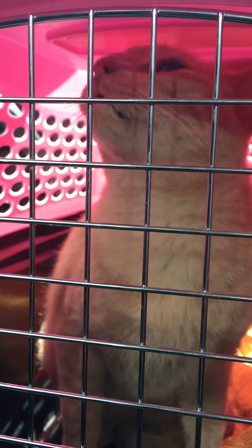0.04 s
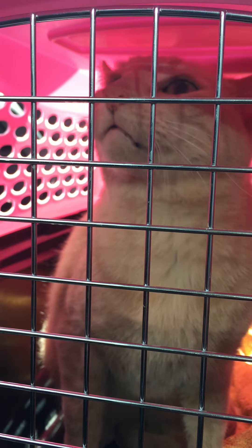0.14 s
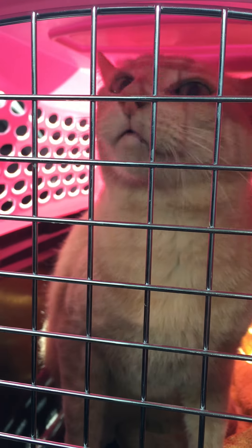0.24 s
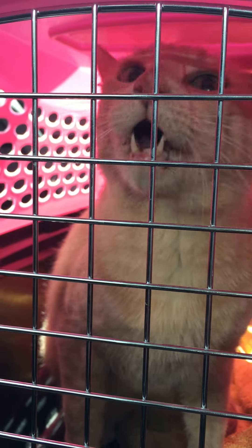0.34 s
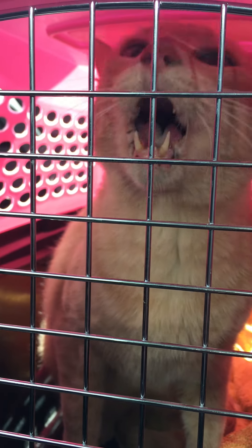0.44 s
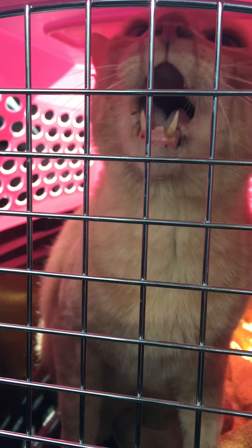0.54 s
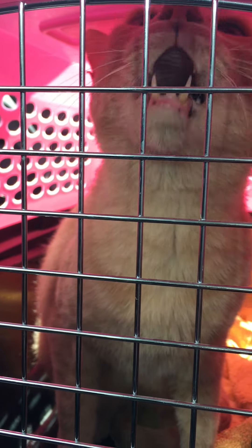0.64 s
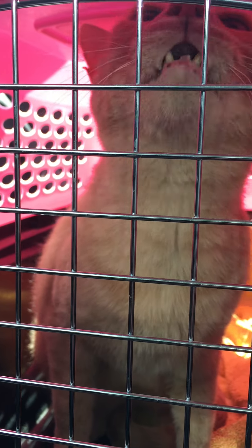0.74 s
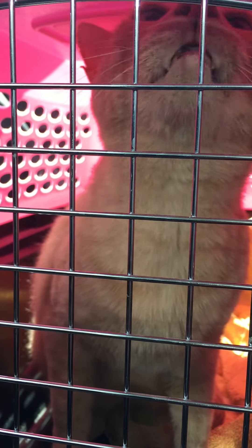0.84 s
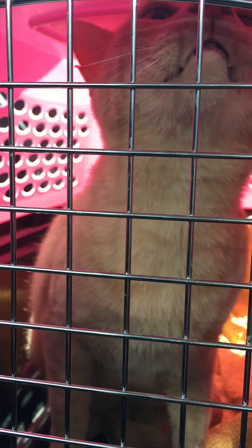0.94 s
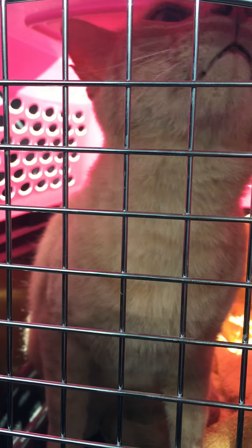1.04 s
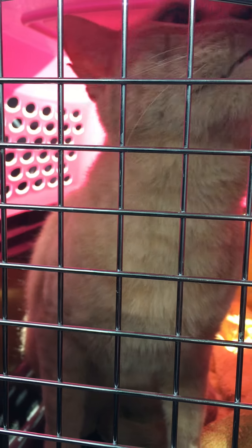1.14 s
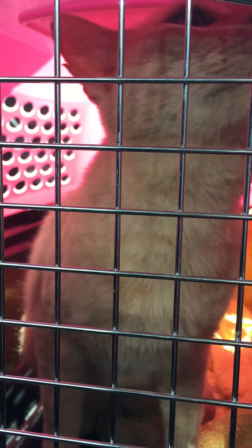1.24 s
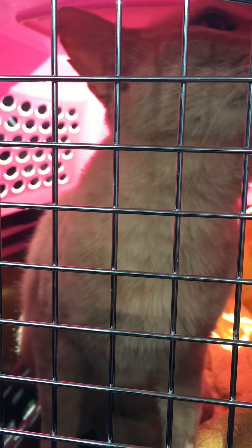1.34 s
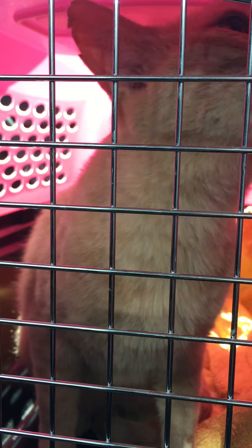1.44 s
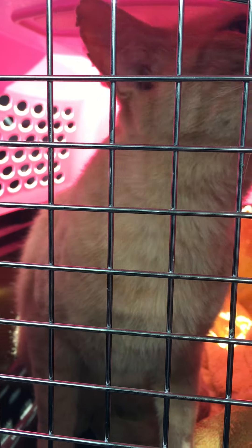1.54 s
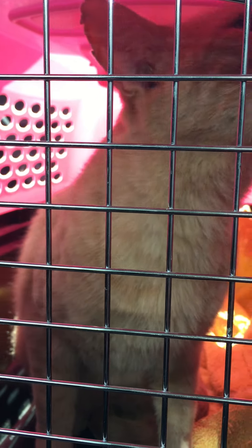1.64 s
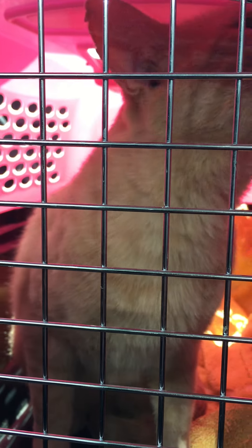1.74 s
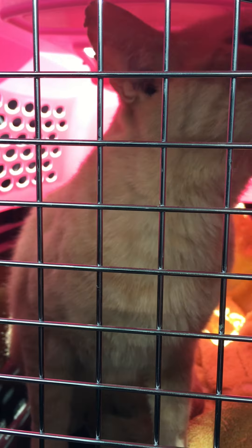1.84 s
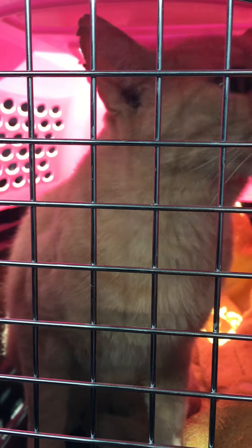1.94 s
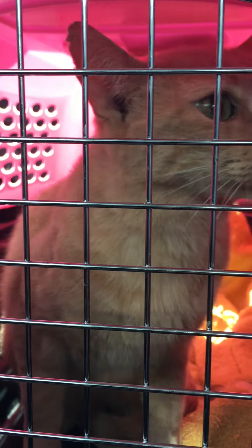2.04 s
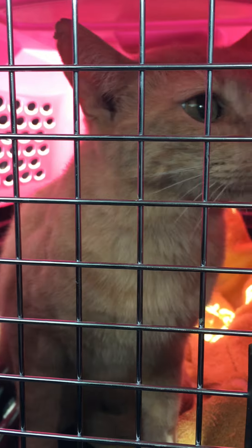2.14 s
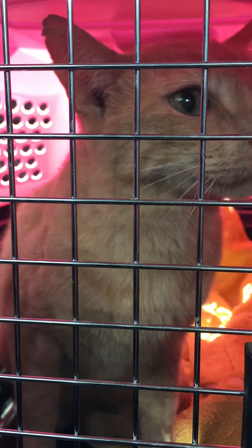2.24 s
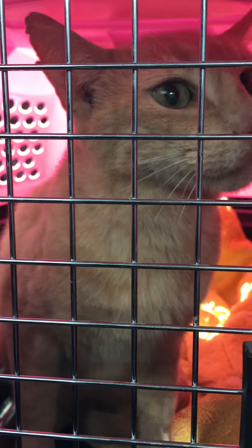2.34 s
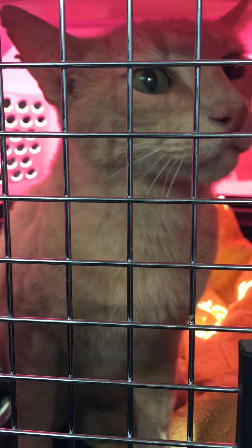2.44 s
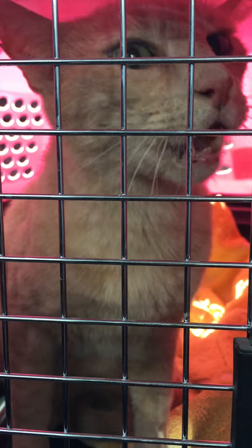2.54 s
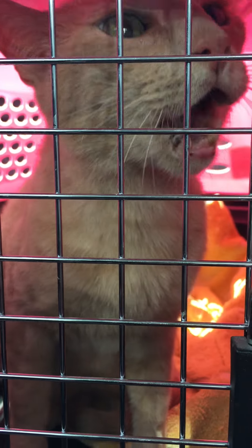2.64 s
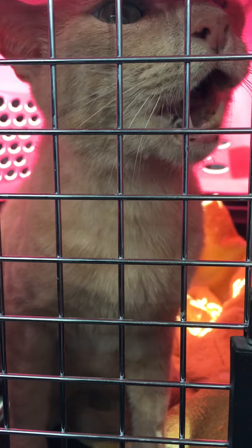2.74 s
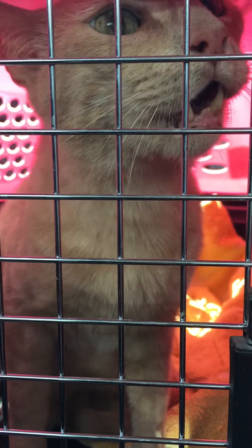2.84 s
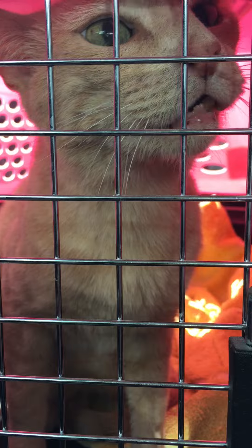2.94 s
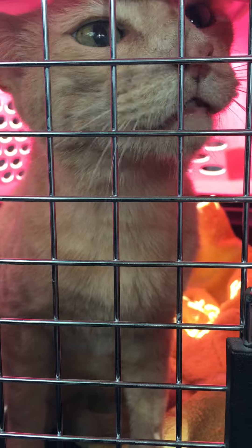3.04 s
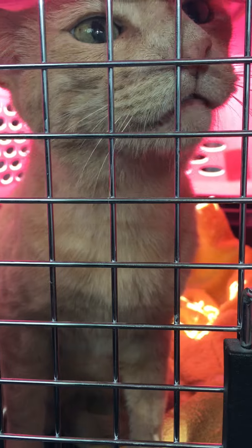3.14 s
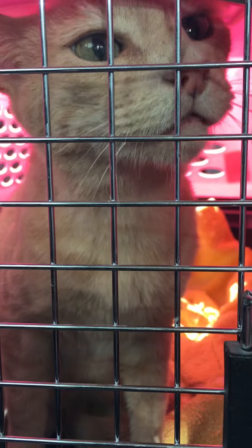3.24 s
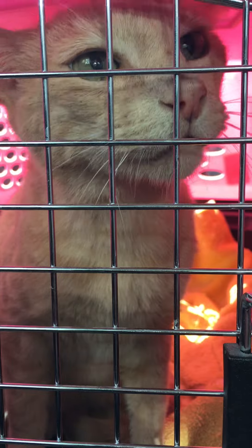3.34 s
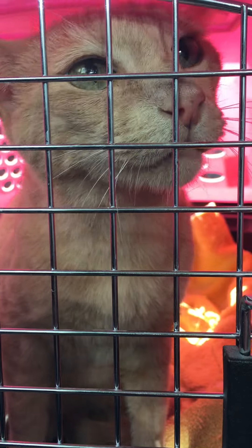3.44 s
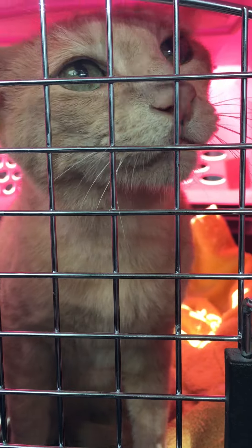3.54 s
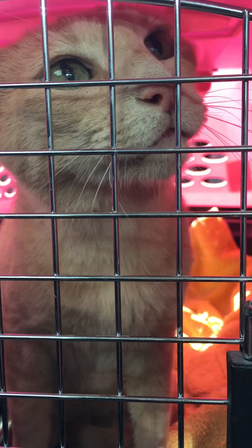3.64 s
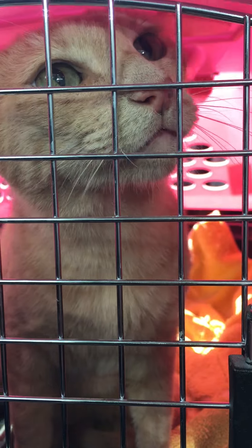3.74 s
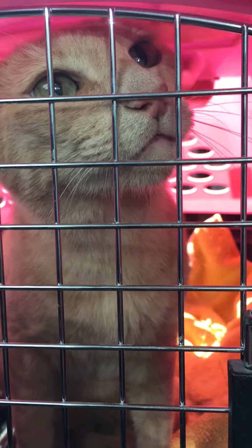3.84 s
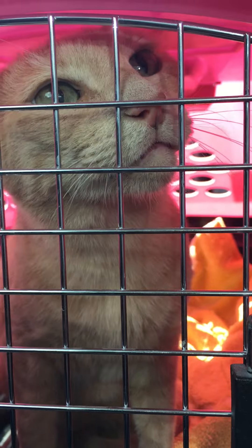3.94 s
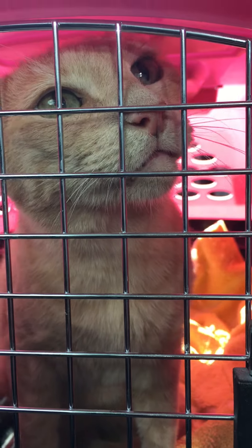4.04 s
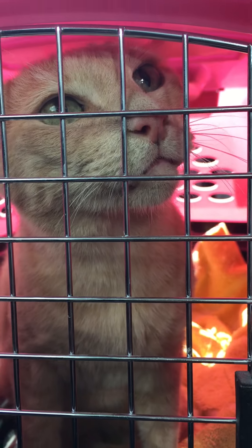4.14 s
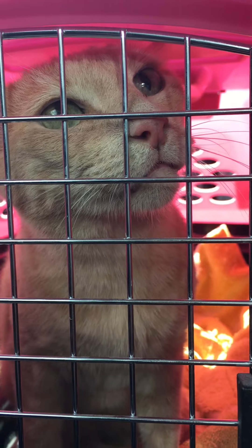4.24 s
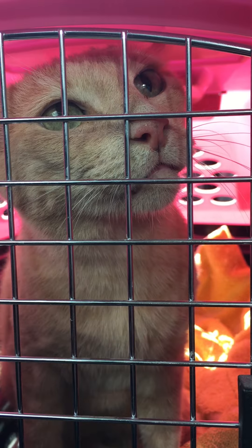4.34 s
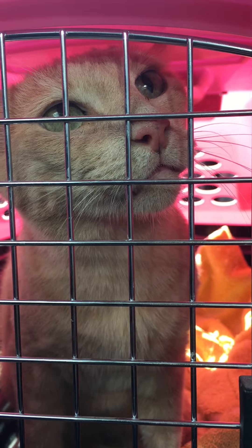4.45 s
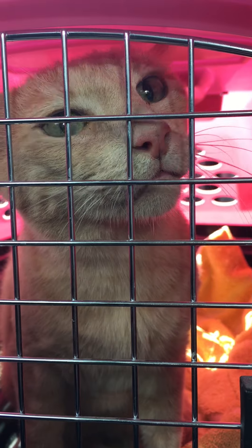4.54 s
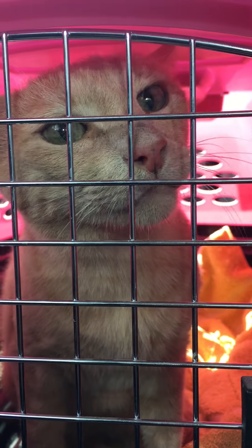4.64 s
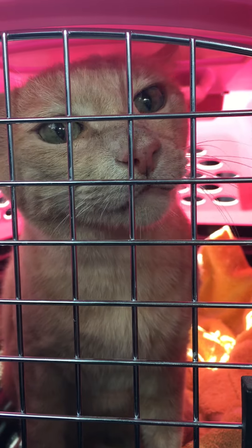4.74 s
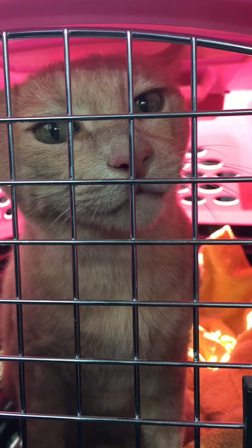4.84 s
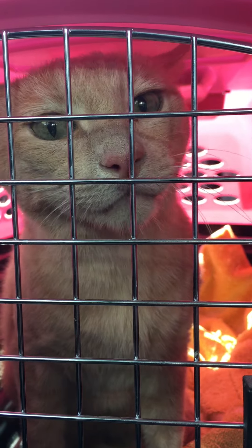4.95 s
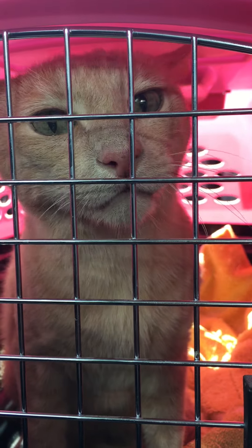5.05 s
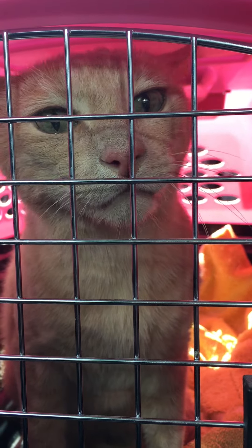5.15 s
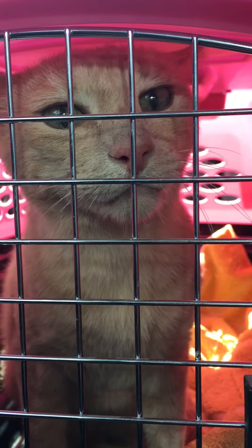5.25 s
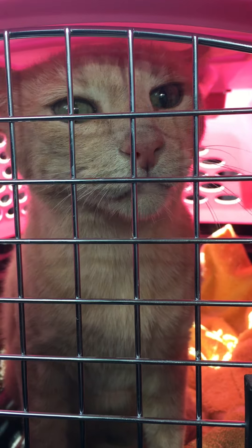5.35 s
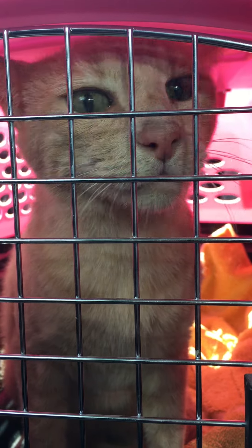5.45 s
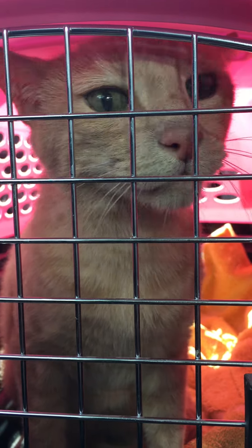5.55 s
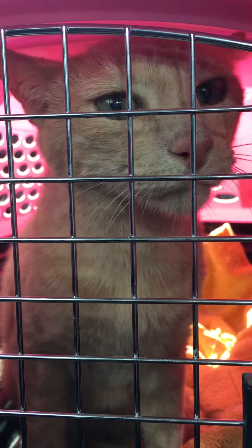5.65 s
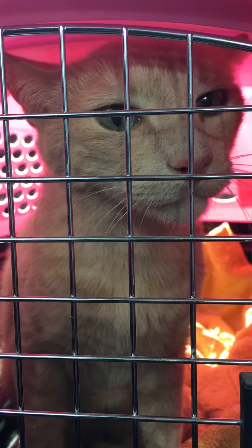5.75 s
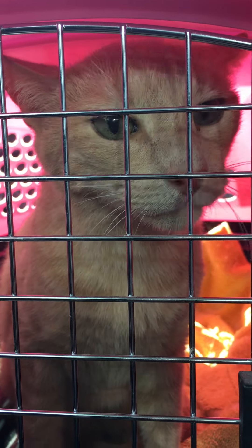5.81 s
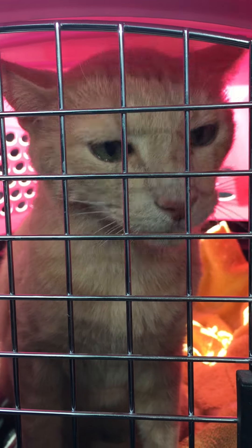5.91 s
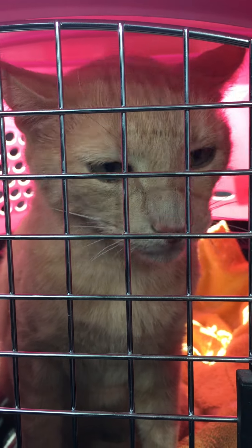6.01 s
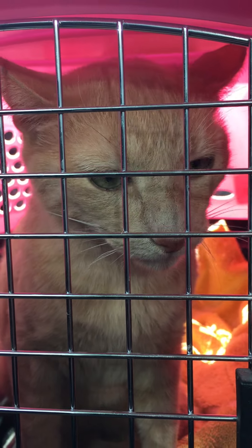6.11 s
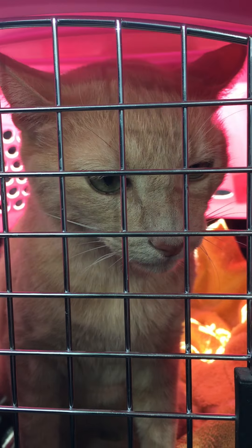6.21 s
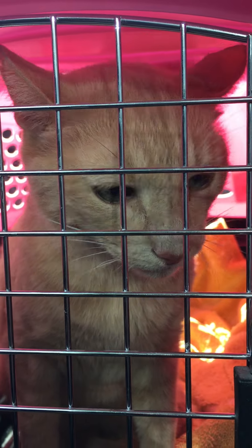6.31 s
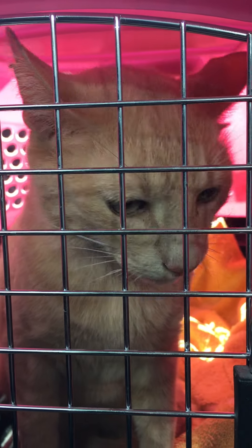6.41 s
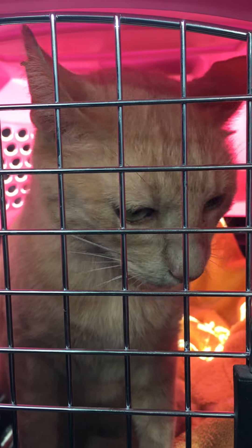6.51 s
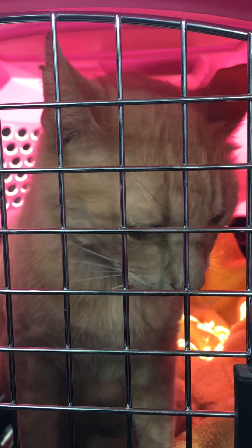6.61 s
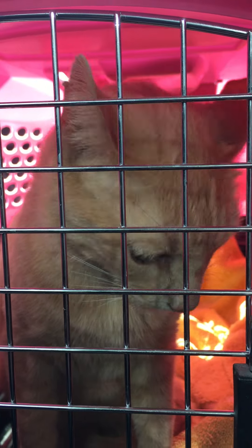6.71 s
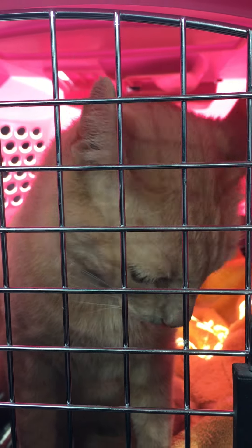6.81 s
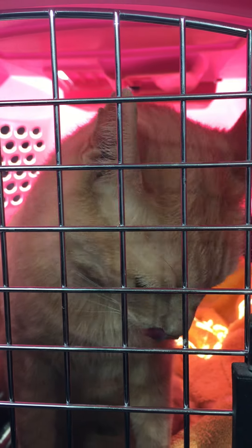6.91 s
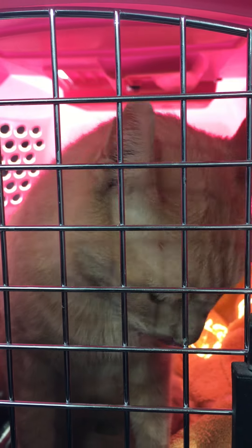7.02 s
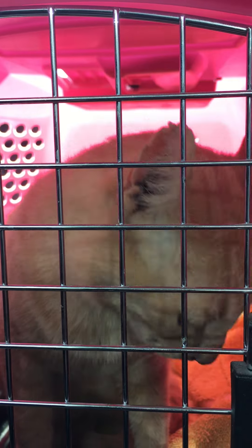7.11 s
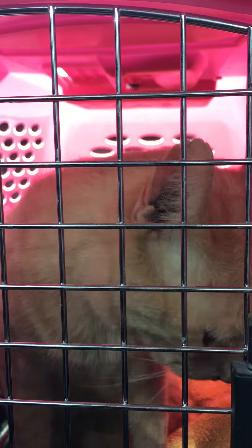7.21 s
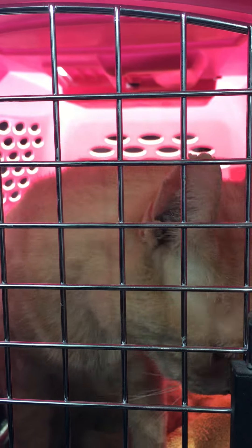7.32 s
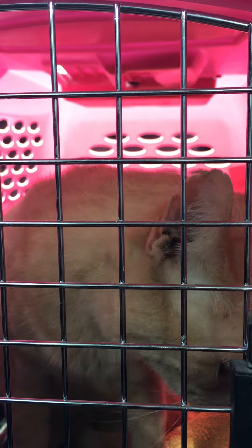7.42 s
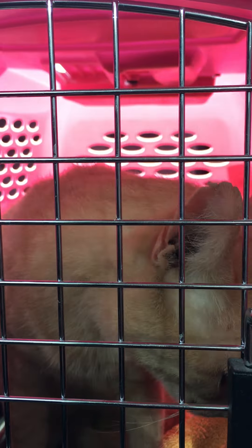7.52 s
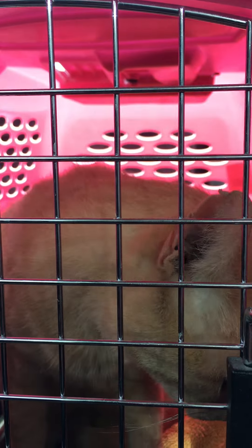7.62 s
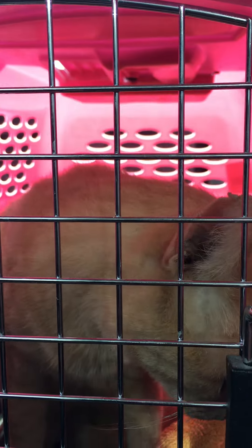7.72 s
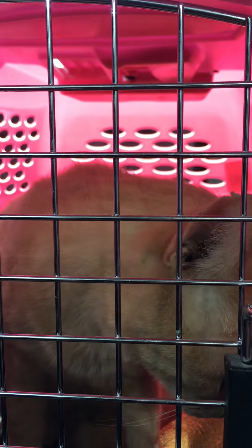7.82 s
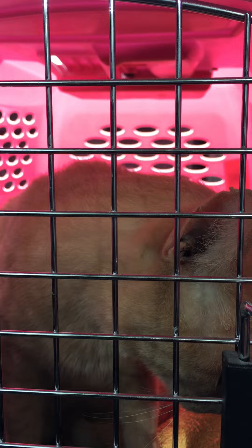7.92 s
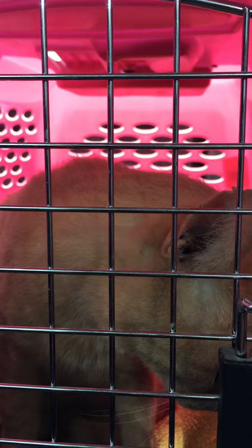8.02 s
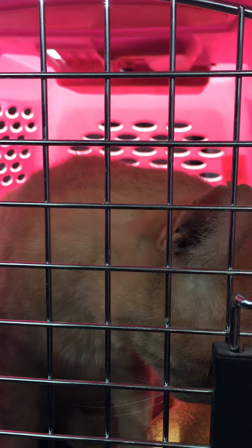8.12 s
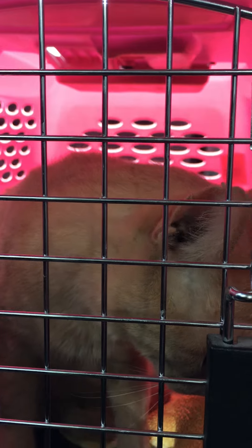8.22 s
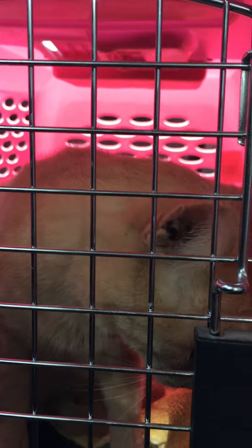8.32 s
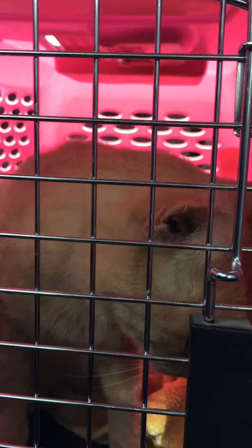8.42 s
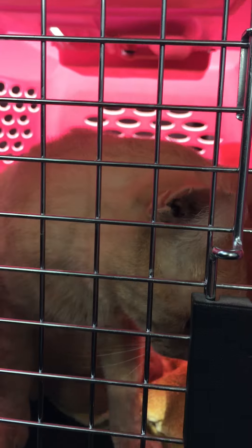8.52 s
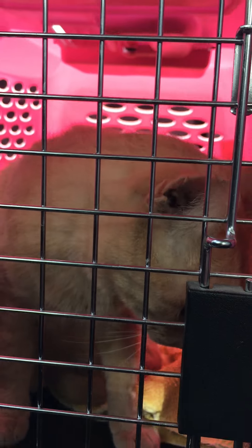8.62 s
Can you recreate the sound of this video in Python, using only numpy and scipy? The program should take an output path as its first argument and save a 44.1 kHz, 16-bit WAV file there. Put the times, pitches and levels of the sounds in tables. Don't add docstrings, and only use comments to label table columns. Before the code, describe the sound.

Inside a moving vehicle, a caged cat yowls loudly twice, then more weakly after a long gap, while the engine hums evenly beneath.

```python
import sys
import numpy as np
from scipy import signal
from scipy.fft import rfft, irfft, next_fast_len
from scipy.io import wavfile
from scipy.ndimage import uniform_filter1d, map_coordinates

SR = 44100
rng = np.random.default_rng(int(sys.argv[2]) if len(sys.argv) > 2 else 0)


def voltage_ratio(decibels):
    exponent = np.asarray(decibels, float) / 20
    return 10 ** exponent


def to_wav(s):
    ch = np.atleast_2d(s).T
    pcm = np.round(np.clip(ch, -1, 1) * 32767)
    wavfile.write(sys.argv[1], SR, pcm.astype(np.int16))


N = 382337


def unit(x):
    return x / np.sqrt(np.mean(x ** 2) + 1e-20)


def along(points, hz):
    point_hz, point_db = np.transpose(points)
    return np.interp(np.log(hz + 1), np.log(point_hz + 1), point_db, left=-120, right=-120)


def wobble(rate_hz, size=N):
    knots = rng.standard_normal(int(size * rate_hz / SR) + 4)
    return map_coordinates(knots, [np.arange(size) * rate_hz / SR])


def noise(gain):
    m = next_fast_len(N)
    spectrum = rfft(rng.standard_normal(m)) * gain(np.fft.rfftfreq(m, 1 / SR))
    return unit(irfft(spectrum, m)[:N])


def resonance(hz, centre_hz, width_hz):
    return centre_hz ** 2 / (centre_hz ** 2 - hz ** 2 + 1j * hz * width_hz)


def bump(t, at_s, length_s):
    return np.exp(-((t - at_s) / length_s) ** 2)


def cat():
    # time_s, held_pitch_hz, effort_db, jaw (0-1), tongue (0-1)
    howl_1 = [
        (.4, 623, -38.5, 0.15, 0.4),
        (.485, 625, -24.5, 0.42, 0.56),
        (.54, 646, -20.5, 0.79, 1),
        (.59, 625, -22, 0.88, .78),
        (.66, 623.8, -19.5, 0.93, 0.61),
        (.8, 597.2, -22, 0.86, 0.68),
        (.885, 580, -24, 0.45, .36),
        (1.02, 569.5, -30.5, .24, 0.1),
        (1.1, 560, -37, 0.15, 0),
    ]
    howl_2 = [
        (2.61, 636, -40.5, 0.081, 0.36),
        (2.67, 611, -26.5, .32, .63),
        (2.72, 617, -21, 0.64, 0.87),
        (2.78, 617, -21.5, 0.83, 0.72),
        (2.855, 629, -17.5, 0.84, 0.65),
        (2.98, 611, -17.5, 0.73, 0.65),
        (3.045, 590.8, -21.5, .48, 0.54),
        (3.27, 551.3, -33, .44, 0.34),
        (3.36, 520, -35.5, .3, 0.07),
    ]
    howl_3 = [
        (7.17, 553, -33, .1, .33),
        (7.235, 555, -32, 0.2, 0.52),
        (7.3, 550, -27, 0.38, 0.32),
        (7.345, 558, -26.5, 0.34, 0.24),
        (7.41, 564.5, -24, 0.39, .29),
        (7.55, 584, -24.5, 0.47, 0.27),
        (7.65, 597.4, -26.5, .57, 0.42),
        (7.72, 599, -30.5, 0.62, 0.45),
        (7.94, 585, -51.5, 0.62, .44),
    ]
    # slack_pitch_hz, middle_s, spread_s, hoarseness_db
    tension = [
        (338.4, .525, .037, 0),
        (336.6, 2.737, 0.036, -1),
        (472, 7.283, .024, -17),
    ]
    # hz, level_db
    toward = [(2600, -5), (3500, -18.5), (4250, -9.5), (4850, -4), (5500, -1.5), (6200, -4), (7100, -11),
              (8000, -15), (9400, -32), (11200, -29), (13000, -37), (15500, -37.5)]
    aside = [(2600, -23), (3600, -9), (4300, -5), (4900, 1), (5500, -2.5), (6200, -0.5), (7000, -4),
             (8000, -1), (9400, -26), (11200, -21), (13000, -30), (15500, -26)]
    away = [(2600, 1.5), (3500, -3), (4100, -8), (4700, -4), (5200, -21), (6200, -19), (7300, -7),
            (8300, -9), (9400, -29), (11200, -18.5), (13000, -48.5), (15500, -18)]
    # time_s, length_s, level_db
    puffs = [
        (0.49, .04, -54),
        (2.73, 0.05, -52),
        (.665, .008, -59),
        (2.815, .008, -51),
    ]
    # hz, db_per_hz
    breath_colour = [(1500, -28), (2600, -14), (3700, -17), (5000, 1), (6100, 4), (7000, -13), (8200, -8.5),
                     (10000, -21), (15600, -22.5)]
    # delay_s, level_db
    walls = [(.0011, -35), (.0019, -47), (.0031, -38), (.0052, -15.5), (.0083, -28)]

    t = np.arange(N) / SR
    flow = sum(voltage_ratio(db) * bump(t, at_s, length_s) for at_s, length_s, db in puffs)
    breath = flow * voltage_ratio(4.6 * wobble(90)) * noise(lambda hz: voltage_ratio(along(breath_colour, hz)))
    voice = howl(howl_1, tension[0], toward, bright_db=-38, chest_db=-36.0)
    voice = voice + howl(howl_2, tension[1], aside, bright_db=-44, chest_db=-33.5)
    voice = voice + howl(howl_3, tension[2], away, bright_db=-40.5, chest_db=-47.5)
    direct = voice + breath
    return direct + sum(voltage_ratio(db) * np.roll(direct, round(delay_s * SR)) for delay_s, db in walls)


def howl(rows, tighten, upper, bright_db, chest_db):
    tilt_db_per_octave, first_width_hz, second_width_hz, nose_hz = -5, 155, 140, 2970
    jitter, shimmer_db, flutter_db, ripple_db, fizz = 0.0022, 2, 2, 2.5, 0.15
    onset_s, cut_s = 0.02, 0.0078

    start_s, end_s = rows[0][0], rows[-1][0]
    start, end = round(start_s * SR), round(end_s * SR)
    t = np.arange(start, end) / SR
    step = t[::32]
    pitch, effort_db, first_hz, second_hz, bright_db, cavities = controls(rows, tighten, step, bright_db)
    k = np.arange(1, 44)[:, None]
    hz = k * pitch

    def drifts(rate_hz):
        return np.array([wobble(rate_hz * 32, size=len(step)) for _ in k])

    folds = voltage_ratio(effort_db + tilt_db_per_octave * np.log2(k))
    throat = folds * resonance(hz, first_hz, first_width_hz) * resonance(hz, second_hz, second_width_hz)
    throat /= np.sqrt(1 + (hz / nose_hz) ** 8)
    glints = sum(g ** 2 * np.exp(-((hz - c) / w) ** 2) for c, w, g in cavities)
    drift = drifts(14)
    flutter = drifts(70)
    ripple = np.interp(hz, np.arange(20000), wobble(SR / 170, size=20000))
    broad = voltage_ratio(bright_db + along(upper, hz) + shimmer_db * drift + ripple_db * ripple)
    mouth = np.sqrt(broad ** 2 + glints) * voltage_ratio(flutter_db * flutter)
    mouth *= 1 + fizz * np.sqrt(hz / 6000) * (600 / pitch) * drifts(450)
    throat *= voltage_ratio(0.71 * (600 / pitch) ** 2 * flutter)
    size = np.hypot(np.abs(throat), mouth)
    size[0] = voltage_ratio(chest_db + 0.27 * effort_db) * np.abs(resonance(pitch, 733, 170))
    lag = np.unwrap(np.angle(throat), axis=1) - 0.31 * k ** 2

    rate_hz = np.interp(t, step, pitch)
    tremble = jitter * (600 / rate_hz) ** 3 * wobble(161.7, size=len(t))
    tremble = tremble + 0.0032 * wobble(14.26, size=len(t))
    turns = np.cumsum(rate_hz * (1 + tremble)) / SR
    voice = 0
    for n, level, phase in zip(k, size, lag):
        voice = voice + np.interp(t, step, level) * np.cos(2 * np.pi * n * turns + np.interp(t, step, phase))
    fade = np.clip(np.minimum((t - start_s) / onset_s, (end_s - t) / cut_s), 0, 1)
    return np.pad(voice * fade, (start, N - end))


def controls(rows, tighten, step, bright_db):
    # time_s, length_s, jump_hz, jaw_step
    breaks = [
        (0.88, 0.0094, 27, -0.054),
        (1.083, .012, 120, -0.084),
        (3.055, 0.013, 24, 0.18),
        (3.318, 0.025, -10.5, -0.27),
        (3.35, .011, 141, -.03),
        (7.27, .018, 3, 0.094),
        (7.332, .006, -6, -0.061),
        (7.494, .012, -7, -0.022),
    ]
    # time_s, length_s, dip_db
    catches = [(0.462, 0.021, -4), (0.512, 0.011, -1.5), (0.555, .01, -3), (0.876, .007, -3.5),
               (1.092, .014, -11), (2.75, .006, -1.5), (2.795, 0.016, -3), (3.06, 0.011, -0.5),
               (3.347, 0.012, -3), (7.209, .013, -12), (7.276, 0.02, -5), (7.36, 0.021, -3.5)]
    # jaw_shut_hz, jaw_open_hz, width_hz, db_over_effort
    slack_cavities = [(2310, 2900, 170, 2), (2400, 4300, 470, -12), (4800, 5200, 170, -12.5),
                      (6200, 5240, 220, -10.5), (8200, 8500, 180, -23)]
    # time_s, length_s, centre_hz, level_db
    head_glints = [(.5, .014, 2650, -29), (.44, .018, 6040, -43), (0.64, 0.047, 3080, -28),
                   (0.678, 0.073, 7850, -35.5), (0.8, 0.053, 11020, -48), (.836, 0.031, 4580, -32.5),
                   (0.896, 0.023, 6060, -44), (0.926, 0.029, 5420, -51), (2.7, .014, 2450, -27),
                   (2.754, .011, 2620, -25), (2.715, .02, 5650, -38), (2.886, 0.041, 6200, -34),
                   (2.98, 0.08, 6580, -34), (3.1, 0.072, 9200, -47), (3.116, .045, 10850, -57),
                   (3.213, 0.062, 4540, -37), (3.09, 0.0398, 14300, -65), (7.27, .03, 5970, -50),
                   (7.298, .021, 5200, -41.5), (7.315, .01, 2130, -32), (7.44, .077, 7300, -50),
                   (7.65, 0.042, 15100, -55), (7.44, .09, 2850, -38.5), (7.523, 0.07, 4130, -38),
                   (7.639, 0.028, 8000, -41), (7.703, 0.073, 6720, -37), (7.737, .036, 11430, -55),
                   (7.72, 0.12, 4820, -42.5)]
    jaw_hz, tongue_hz = (598, 1825), (1494, 2900)
    snap_db, snap_s, snap_hz = 6.5, 0.065, 25

    def span(ends, u):
        return ends[0] + (ends[1] - ends[0]) * u

    def smooth(column):
        return uniform_filter1d(np.interp(step, time_s, column), size=23, mode="nearest")

    time_s, *columns = np.transpose(rows)
    held_hz, effort_db, jaw, tongue = [smooth(c) for c in columns]
    slack_hz, middle_s, spread_s, hoarse_db = tighten
    tight = 1 / (1 + np.exp((middle_s - step) / spread_s))
    pitch = slack_hz + (held_hz - slack_hz) * tight
    for at_s, length_s, jump_hz, jaw_step in breaks:
        after = (time_s[0] < at_s) * (1 + np.tanh(2 * (step - at_s) / length_s)) / 2
        pitch = pitch + jump_hz * after
        jaw = jaw + jaw_step * after
        snap = np.clip(jump_hz / snap_hz, 0, 1) * after * np.exp(-np.abs(step - at_s) / snap_s)
        bright_db = bright_db + snap_db * snap
    for at_s, length_s, db in catches:
        effort_db = effort_db + db * bump(step, at_s, length_s)
    bright_db = bright_db + 0.86 * effort_db + 24 * jaw + 3.5 * tongue

    cavities = []
    for shut_hz, open_hz, width_hz, db in slack_cavities:
        level = (1 - tight) * np.clip(3 * jaw, 0, 1) * voltage_ratio(db + hoarse_db + effort_db)
        cavities.append((span((shut_hz, open_hz), jaw), width_hz, level))
    for at_s, length_s, centre_hz, db in head_glints:
        cavities.append((centre_hz, 202, voltage_ratio(db) * np.exp(-((step - at_s) / length_s) ** 2 / 2)))
    return pitch, effort_db, span(jaw_hz, jaw), span(tongue_hz, tongue), bright_db, cavities


def engine():
    # multiple, rms_db
    orders = [(1, -45), (2, -35), (3, -44), (4, -52), (5, -46.5), (6, -47)]
    # hz, rms_db
    whine = [(3198, -65)]
    shaft_hz = 45.1
    turns = np.cumsum(shaft_hz * (1 + 0.0024 * wobble(1.2))) / SR
    lines = [(k, db) for k, db in orders] + [(hz / shaft_hz, db) for hz, db in whine]
    drone = 0
    for multiple, db in lines:
        swell = np.sqrt(2) * voltage_ratio(db + 0.87 * wobble(4))
        drone = drone + swell * np.sin(2 * np.pi * (multiple * turns + rng.random()))
    return drone


def cabin():
    # hz, db_per_hz
    boom_colour = [(28, -44), (38, -20.5), (52, -13.5), (84, -19), (99, -8.5), (108, -12.5), (133, -15.5),
                   (160, -20.5), (195, -23), (250, -15), (300, -29.5), (420, -51)]
    rush_colour = [(160, -35.5), (280, -5.5), (320, -5), (512, -9), (700, -8.5), (881, -12), (1010, -8.5),
                   (1180, -14.5), (1570, -15.5), (1950, -19), (3320, -22.5), (5000, -30.5), (6500, -56.5),
                   (11000, -120)]
    hiss_colour = [(2940, -34), (5000, -5.5), (5420, 0.5), (6710, 0), (7810, -7), (9270, -7),
                   (10600, -17.5), (11100, -13.5), (11700, -14), (14800, -16), (15600, -25.5)]
    # centre_hz, width_hz, level_db (level unused)
    hollows = [(1022, 40, 0), (1652, 130, -6), (2230, 150, -10), (3080, 17, -12), (4100, 55, -17),
               (5300, 140, -20), (6110, 82, -21), (11400, 260, -33)]

    def hollow(hz):
        return 1 + sum(0.5 / (1 + (2 * (hz - c) / w) ** 2) for c, w, _ in hollows)

    boom = voltage_ratio(-33 + 0.22 * wobble(0.55)) * noise(lambda hz: voltage_ratio(along(boom_colour, hz)))
    rush = voltage_ratio(-39 + 0.54 * wobble(3.42)) * noise(lambda hz: voltage_ratio(along(rush_colour, hz)) * hollow(hz))
    hiss = voltage_ratio(-57 + 0.4 * wobble(5)) * noise(lambda hz: voltage_ratio(along(hiss_colour, hz)) * hollow(hz))
    m = next_fast_len(N)
    notch = 1 - 0.5 / (1 + ((np.fft.rfftfreq(m, 1 / SR) - 4980) / 130) ** 2)
    return boom + irfft(rfft(rush + hiss, m) * notch, m)[:N]


def scene():
    return (cat() + engine() + cabin())[None]


def roll_off(x):
    return signal.sosfilt(signal.butter(12, 15710, fs=SR, output="sos"), x)


def record(dry):
    knee_db, ratio, release_s = -27, 0.26, 0.087
    power = uniform_filter1d(dry ** 2, 1500, axis=1)
    keep = np.exp(-1 / (release_s * SR))
    held = np.maximum(power, signal.lfilter([1 - keep], [1, -keep], power))
    gain = (1 + np.abs(held) / voltage_ratio(2 * knee_db)) ** (-ratio / 2)
    return roll_off(dry * gain)


dry = scene()
out = record(dry)
to_wav(out)
```